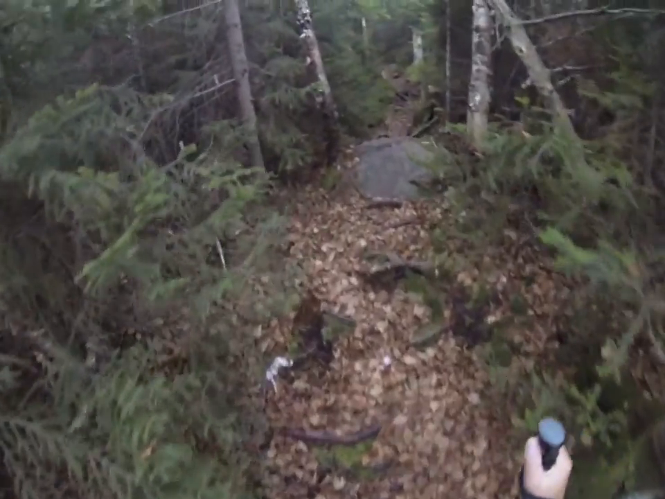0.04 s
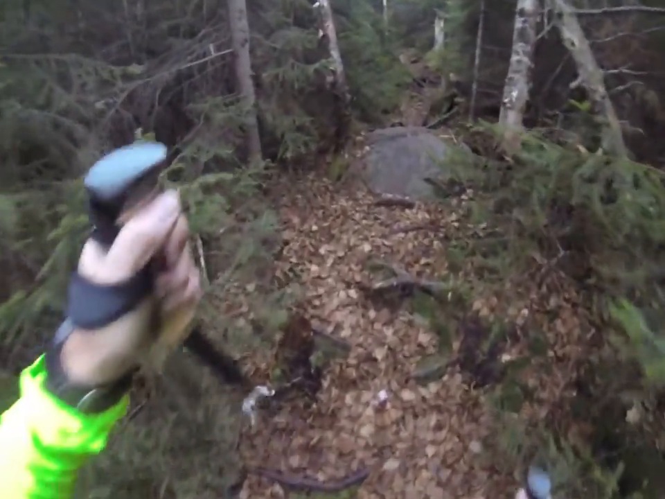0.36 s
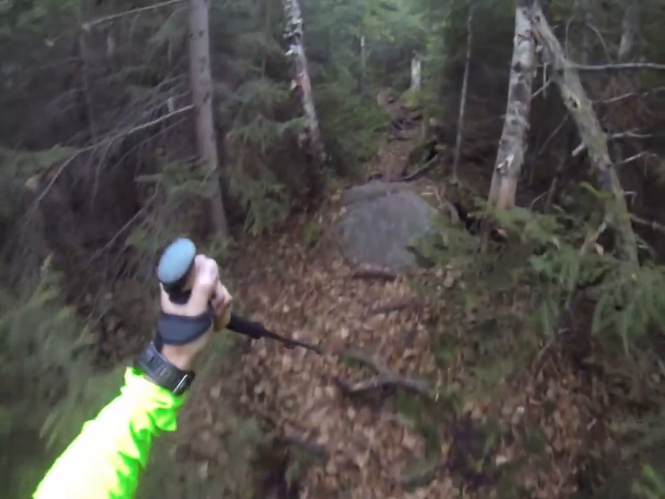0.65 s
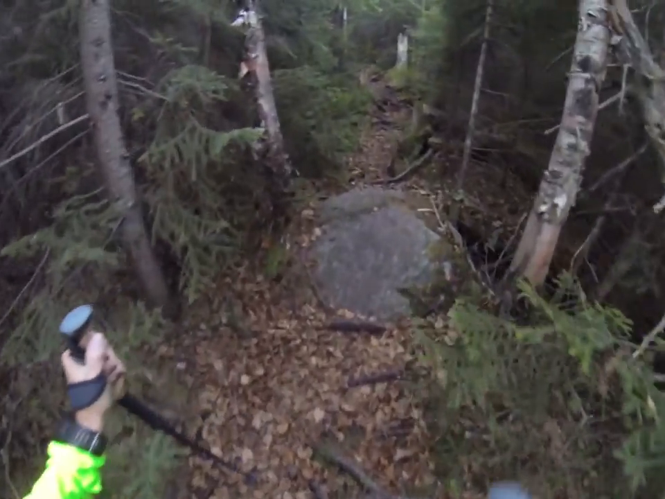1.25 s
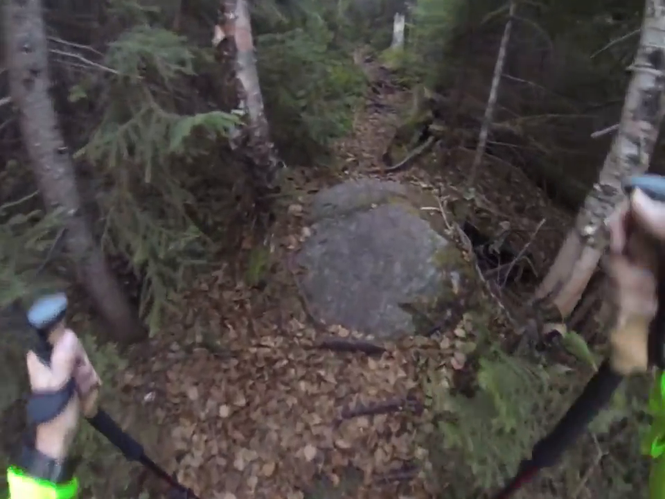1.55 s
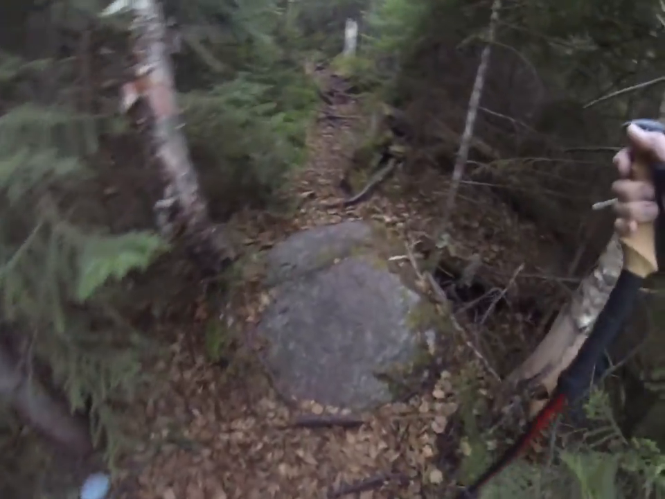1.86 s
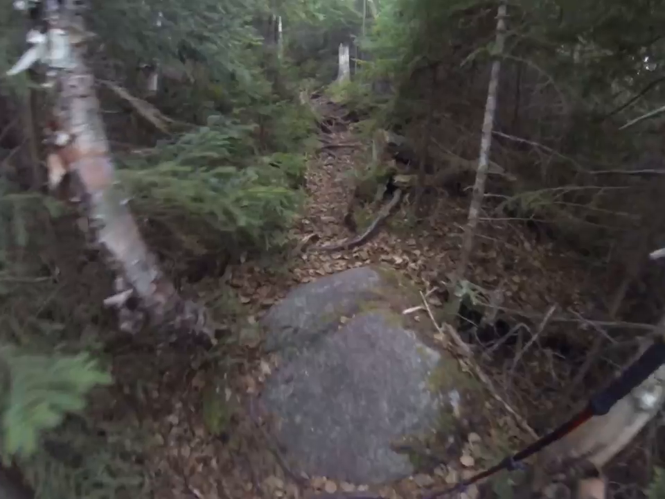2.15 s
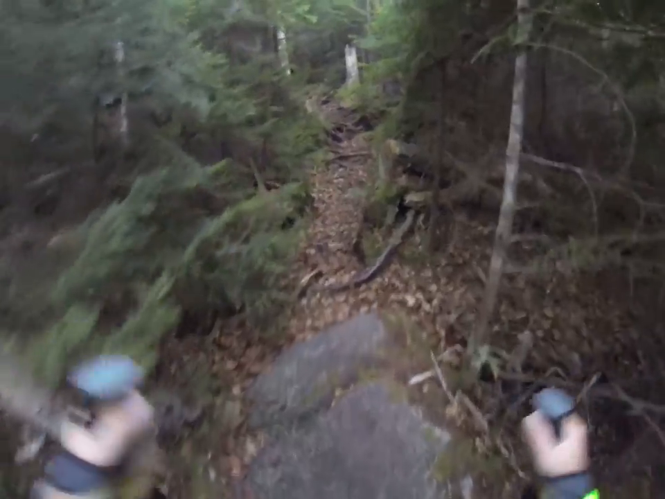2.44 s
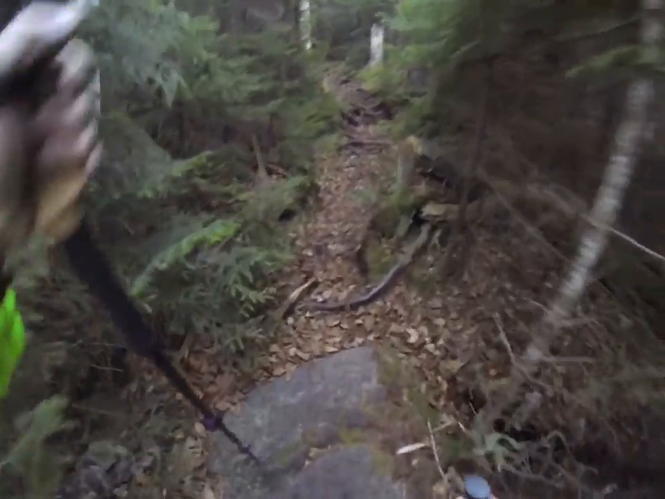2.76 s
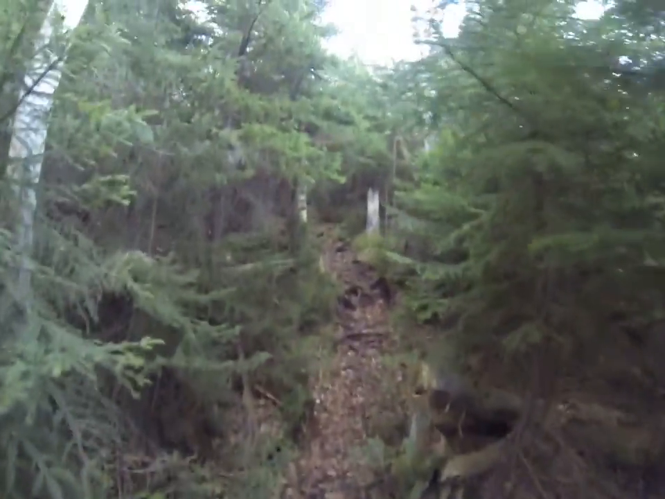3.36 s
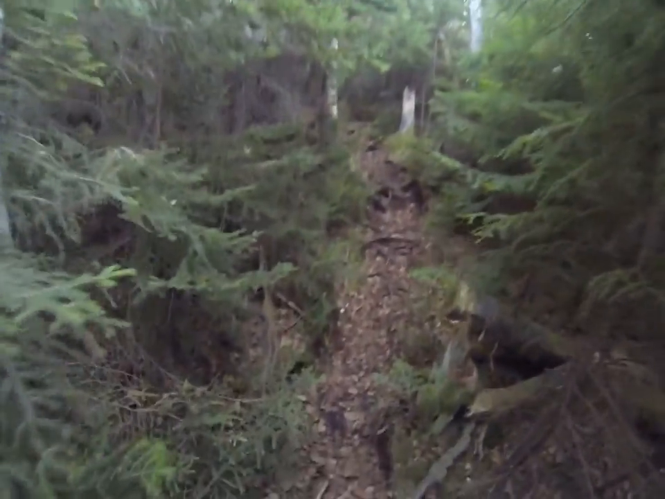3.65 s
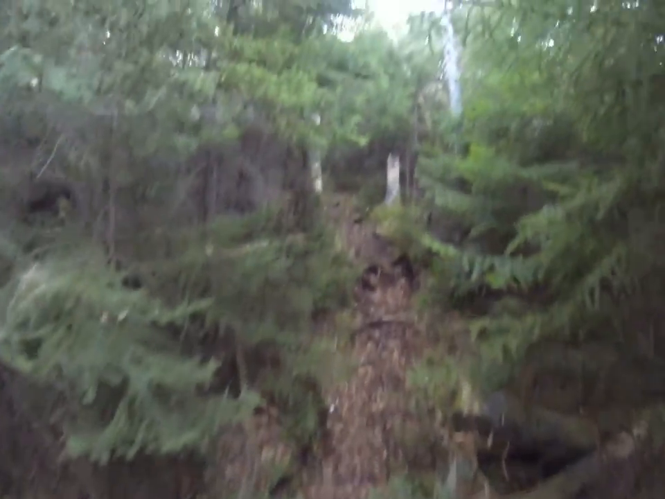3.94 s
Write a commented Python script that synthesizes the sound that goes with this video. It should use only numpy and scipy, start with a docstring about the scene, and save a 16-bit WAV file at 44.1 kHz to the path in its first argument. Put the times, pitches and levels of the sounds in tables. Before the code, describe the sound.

Two sharp trekking pole strikes on rock over low handling rumble and soft rustling.

```python
"""Clothes rub, dry leaves rustle and a body-worn camera rumbles as a hiker climbs a forest trail.
Steps shake the camera mount, which bumps a few times. Two pole tips strike rock in turn and chatter:
each contact cracks, rings the shaft and scrapes. Behind it: forest air, microphone hiss and a faint
whine from the camera's electronics, pulsing once a frame."""
import sys
import numpy as np
from scipy.fft import rfft, irfft, next_fast_len
from scipy.io import wavfile
from scipy.ndimage import uniform_filter1d, map_coordinates

SR = 44100
rng = np.random.default_rng(int(sys.argv[2]) if len(sys.argv) > 2 else 0)


def generate_wav(signal):
    """Clip the signal to [-1, 1] and save it as 16-bit WAV at the path in sys.argv[1]."""
    frames = np.transpose(np.atleast_2d(signal))
    scaled = np.clip(frames, -1, 1) * 32767
    pcm = np.round(scaled).astype(np.int16)
    wavfile.write(sys.argv[1], SR, pcm)


N = 176400

# Tip contacts on rock (time [s], level [dB])
RIGHT_CONTACTS = [(1.5498, -20), (1.5545, -38), (1.5593, -25.5), (1.562, -31.5), (1.5687, -35),
                  (1.5855, -47), (1.5935, -40), (1.6105, -46), (1.617, -43.5), (1.643, -51)]
LEFT_CONTACTS = [(2.7176, -21), (2.7192, -21.5), (2.729, -33.5), (2.7348, -27.5), (2.7465, -37),
                 (2.7865, -43.5), (2.8132, -46), (2.8255, -58), (2.831, -51)]
# Shaft modes (frequency [Hz], relative level [dB], T60 [s])
RIGHT_SHAFT_MODES = [(440, -19, .03), (1190, -4, .045), (1418, -3, .045), (1684, 0, .03), (1824, 1, .03),
                     (2140, -3, .045), (2325, -8, .035), (2900, -3, .05), (3030, -2, .05),
                     (3320, -17, .035), (3995, -3, .038), (4118, -9, .04), (4334, -10, .05),
                     (4475, -7, .05), (5216, -18, .05)]
LEFT_SHAFT_MODES = [(330, -25, .03), (1061, -14, .05), (1250, -3, .05), (1421, -3, .05), (1754, -2, .03),
                    (1880, 0, .045), (2140, -2, .035), (2452, -4, .04), (2648, -6, .035), (3553, -7, .045),
                    (3670, -5, .03), (4743, -8, .035), (4960, -5, .03), (5324, -9, .035), (5560, -11, .025)]
# Mount shake envelope (time [s], level [dB])
SHAKE_ENVELOPE = [(0.08, -41), (0.26, -35.5), (0.37, -41), (0.45, -21), (0.57, -26), (0.59, -32.5),
                  (0.8, -48), (1.05, -22.5), (1.15, -26.5), (1.27, -42), (1.37, -51), (1.41, -39),
                  (1.54, -32.5), (1.57, -54), (1.64, -17.5), (1.7, -40), (1.73, -24.5), (1.86, -38),
                  (1.94, -31.5), (2.06, -58), (2.12, -35.5), (2.33, -30), (2.36, -17.5), (2.43, -30),
                  (2.59, -30.5), (2.63, -53.5), (2.78, -23.5), (2.91, -29.5), (2.95, -21.5), (3.17, -35.5),
                  (3.25, -30.5), (3.3, -46), (3.42, -38), (3.63, -36), (3.74, -20.5), (4.0, -43.5)]
# Mount bumps (time [s], peak [dB], half width [s])
MOUNT_BUMPS = [(2.8832, -19.5, 0.0014), (3.4197, -22, 0.0022), (3.4366, -22, 0.0024), (3.4546, -22, 0.0027)]
# Clothing rubs (start [s], length [s], level [dB])
CLOTH_RUBS = [(.045, 0.11, -56.5), (0.594, 0.068, -62.5), (0.661, 0.038, -52.5), (0.794, 0.086, -56.5),
              (0.982, 0.18, -59.5), (1.241, 0.15, -61), (1.476, 0.092, -60), (1.68, 0.082, -58.5),
              (2.046, 0.089, -57), (2.206, 0.094, -56.5), (2.376, 0.12, -69), (2.48, 0.073, -58.5),
              (2.57, 0.098, -52.5), (2.77, 0.152, -55.5), (3.152, .07, -56), (3.274, .11, -52.5),
              (3.386, 0.088, -47), (3.496, 0.13, -51.5), (3.659, 0.062, -59), (3.729, 0.064, -55.5),
              (3.805, 0.051, -57.5), (3.923, 0.12, -56)]
# Foliage brushes (start [s], length [s], level [dB], twig re leaves [dB])
LEAF_BRUSHES = [(0.296, 0.021, -59.5, 2), (0.332, 0.037, -62.5, -2), (.375, 0.022, -58, -2.5),
                (0.474, 0.065, -71, -18), (0.94, 0.07, -64.5, -8), (1.08, 0.085, -73, -6),
                (2.381, .07, -64, -3), (3.41, 0.044, -60.5, -21)]
# Noise spectra (frequency [Hz], relative level [dB])
RIGHT_TIP_SPECTRUM = [(300, -17), (480, -6), (750, -25), (1200, -1.5), (1800, 4.5), (2600, -8.5), (3000, 5),
                      (3600, -18), (4150, -3), (5300, -13.5), (6400, -44), (11000, -29), (15000, -41)]
LEFT_TIP_SPECTRUM = [(300, -33), (950, -11.5), (1300, -1), (2000, 0.5), (2650, -2.5), (3050, -13),
                     (3600, -2), (4100, -16), (4900, -4), (5650, -13.5), (6400, -27), (11000, -28.5),
                     (15000, -39)]
JOLT_SPECTRUM = [(20, 5.5), (40, -4.5), (60, -8), (85, -20), (130, -31), (250, -41), (600, -71),
                 (2000, -100)]
CLOTH_SPECTRUM = [(120, -7.5), (270, 9.5), (420, 0), (700, -4), (1050, -11), (1350, 0.5), (1800, -1),
                  (2300, -14.5), (3400, -16), (4500, -27), (8000, -43), (15000, -35)]
LEAF_SPECTRUM = [(300, -0.5), (900, 0), (1350, 9), (1900, -1), (2700, 2.5), (4000, -3), (5000, -0.5),
                 (6200, -13), (11000, -13), (15000, -36)]
AIR_SPECTRUM = [(30, 6.5), (80, 7), (160, -3), (280, -5), (420, -10), (700, -13), (1050, -16.5),
                (1400, -11), (2100, -19), (3200, -18.5), (4400, -25), (7000, -30), (9000, -27.5),
                (11500, -30), (13400, -32), (14300, -64), (15200, -38)]
ELECTRONICS_SPECTRUM = [(5000, -42), (7500, -12.5), (9200, -10), (11500, -21), (12400, -9), (12900, -14),
                        (13700, -5), (14400, -10.5)]


def pole(contacts, modes, spectrum, ring_attack_s=0.00033, crack_attack_s=0.00088,
         crack_t60_s=0.019, scrape_t60_s=0.26, ring_gain_db=-0.5, scrape_gain_db=-32):
    """Each contact cracks, rings the shaft and leaves a gritty scrape as the tip settles."""
    t = np.arange(SR // 3) / SR
    shaft = sum((-1) ** k * amp(db - 60 * t / t60_s) * np.sin(2 * np.pi * hz * t)
                for k, (hz, db, t60_s) in enumerate(modes))
    shaft = shaft / np.abs(shaft).max() * (1 - np.exp(-t / ring_attack_s))
    burst = amp(-60 * t / crack_t60_s) * (1 - np.exp(-t / crack_attack_s))
    ring, crack_power, scrape_power = np.zeros((3, N))
    for time_s, db in contacts:
        onset = round(time_s * SR)
        span = slice(onset, onset + len(t))
        ring[span] += amp(db + ring_gain_db) * shaft
        crack_power[span] += (amp(db) * burst) ** 2
        scrape_power[span] += amp(db + scrape_gain_db - 60 * t / scrape_t60_s) ** 2
    grit = amp(4.8 * wobble(450))
    return ring + np.sqrt(crack_power + scrape_power * grit ** 2) * noise(spectrum)


def mount(resonance_hz=26.13, sway_gain_db=0.5, jolt_gain_db=-7.5):
    """Steps jolt the mount and rock it at its low resonance; bumps push it one way and back."""
    t = clock()
    shake_db = np.interp(t, *np.transpose(SHAKE_ENVELOPE))
    cycles = np.cumsum(resonance_hz * np.exp(0.2205 * wobble(20))) / SR
    sway = amp(shake_db + sway_gain_db) * unit(np.sin(2 * np.pi * cycles))
    compressed_db = shake_db.max() + 0.67 * (shake_db - shake_db.max())
    jolts = amp(compressed_db + jolt_gain_db) * noise(JOLT_SPECTRUM)
    bumps = sum(amp(db) * push((t - time_s) / half_width_s) for time_s, db, half_width_s in MOUNT_BUMPS)
    return sway + jolts + bumps


def clothes(edge_s=0.027, roughness_db=2.5):
    """Fabric slides in short, slightly rough strokes."""
    envelope = sum(amp(db) * stroke(start_s, length_s, edge_s) for start_s, length_s, db in CLOTH_RUBS)
    return envelope * unit(noise(CLOTH_SPECTRUM) * amp(roughness_db * wobble(150)))


def leaves(grain_db=4, twig_hz=2700, twig_half_width_hz=270):
    """Grainy rustle, with the narrow zip of a twig sliding along a shaft."""
    rustle = unit(noise(LEAF_SPECTRUM) * amp(grain_db * wobble(400)))
    white = rng.standard_normal(N)
    twig = unit(filtered(white, lambda hz: 1 / (1 + ((hz - twig_hz) / twig_half_width_hz) ** 2)))
    return sum(amp(db) * swish(start_s, length_s) * (rustle + amp(twig_db) * twig)
               for start_s, length_s, db, twig_db in LEAF_BRUSHES)


def air(level_db=-56.5):
    """Steady forest air and microphone hiss."""
    return amp(level_db) * noise(AIR_SPECTRUM)


def whine(frame_hz=47.952, start_s=0.0031, pulse_s=0.0086, pitch_hz=6448, drift_hz=14.3, jitter_hz=22.5,
          tone_db=-64.5, overtone_db=-58, hiss_db=-70, idle_gain=0.32):
    """The electronics whistle and hiss once a frame; weaker hiss between pulses."""
    frame_time_s = (clock() - start_s) % (1 / frame_hz)
    gate = uniform_filter1d((frame_time_s < pulse_s) * 1., size=16)
    phase = 2 * np.pi * np.cumsum(pitch_hz + drift_hz * wobble(40) + jitter_hz * wobble(1000)) / SR
    flicker = amp(wobble(700))
    tone = flicker * (amp(tone_db) * np.sin(phase) + amp(overtone_db) * np.sin(2 * phase))
    hiss = amp(hiss_db) * noise(ELECTRONICS_SPECTRUM)
    return gate * tone + (gate + idle_gain * (1 - gate)) * hiss


def push(half_widths):
    """One push and rebound, peak 1."""
    slope = np.tanh(half_widths)
    return 2 * slope * np.sqrt(1 - slope ** 2)


def stroke(start_s, length_s, edge_s):
    """Rise, hold and fall of one slide."""
    t = clock() - start_s
    return np.sin(np.pi / 2 * np.clip(np.minimum(t, length_s - t) / edge_s, 0, 1))


def swish(start_s, length_s, rise_s=0.0069, settle_s=0.044):
    """Quick rise and hold, then the foliage settles."""
    t = clock() - start_s
    return np.clip(t / rise_s, 0, 1) * np.exp(-np.maximum(t - length_s, 0) / settle_s)


def amp(db):
    """Decibels to gain."""
    return 10 ** (np.asarray(db) / 20)


def unit(x):
    """Scale to rms 1."""
    return x / np.sqrt(np.mean(x ** 2) + 1e-20)


def clock():
    """Sample times [s]."""
    return np.arange(N) / SR


def wobble(knots_per_s):
    """Smooth random curve."""
    return map_coordinates(rng.standard_normal(int(N * knots_per_s / SR) + 4), [clock() * knots_per_s])


def filtered(x, response):
    """Apply a frequency response."""
    size = next_fast_len(N + SR // 2)
    return irfft(rfft(x, size) * response(np.fft.rfftfreq(size, 1 / SR)), size)[:N]


def noise(spectrum):
    """Shaped noise, rms 1."""
    knots_hz, db = np.transpose(spectrum)
    white = rng.standard_normal(N)
    return unit(filtered(white, lambda hz: amp(np.interp(np.log(hz + 1), np.log(knots_hz), db))))


def scene():
    """Poles, hiker and forest air at one microphone."""
    right = pole(RIGHT_CONTACTS, RIGHT_SHAFT_MODES, RIGHT_TIP_SPECTRUM)
    left = pole(LEFT_CONTACTS, LEFT_SHAFT_MODES, LEFT_TIP_SPECTRUM)
    return (right + left + mount() + clothes() + leaves() + air())[None]


def record(dry):
    """The camera adds its whine and limits the band."""
    cutoff_hz = 15300
    return filtered(dry[0] + whine(), lambda hz: hz < cutoff_hz)[None]


dry = scene()
out = record(dry)
generate_wav(out)
```